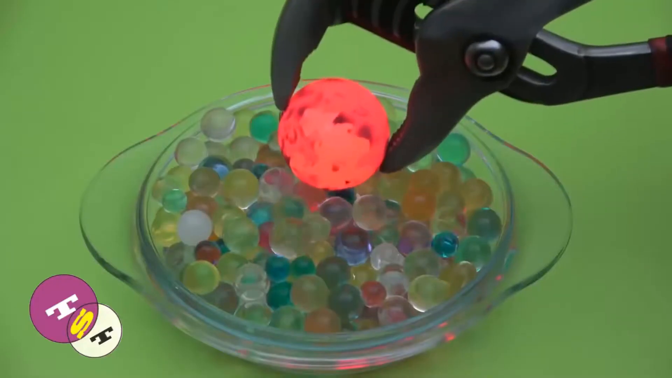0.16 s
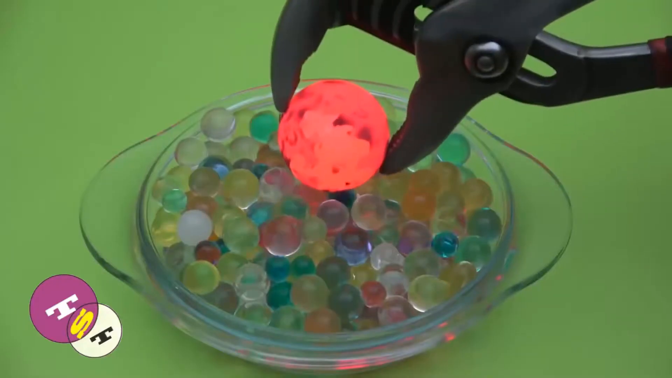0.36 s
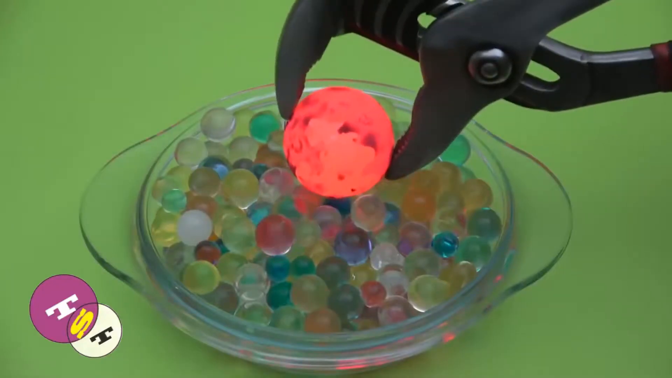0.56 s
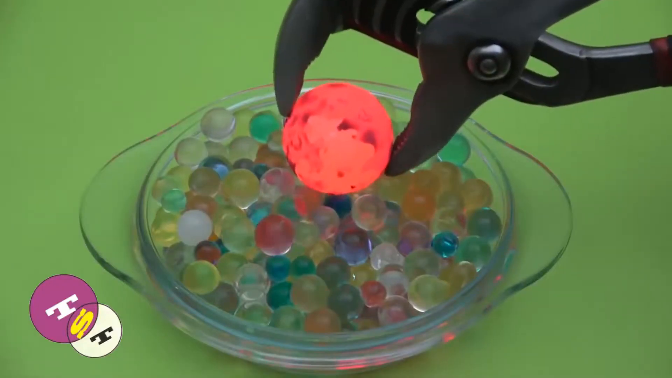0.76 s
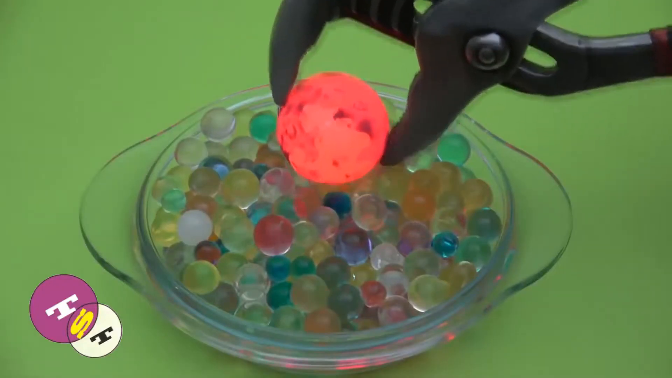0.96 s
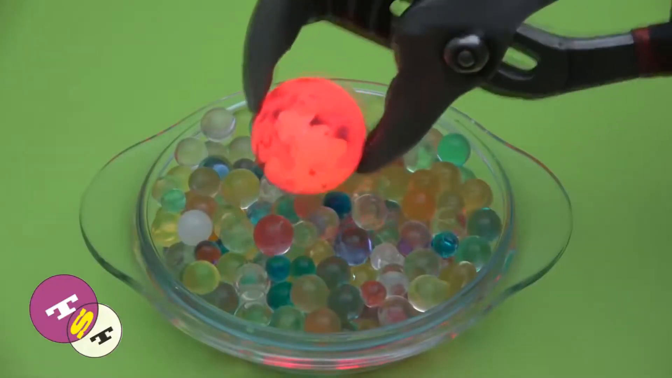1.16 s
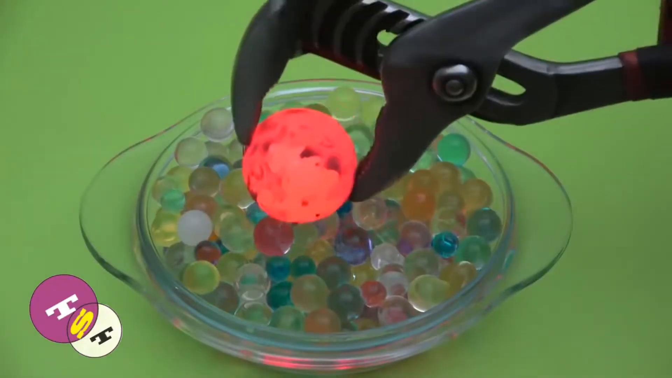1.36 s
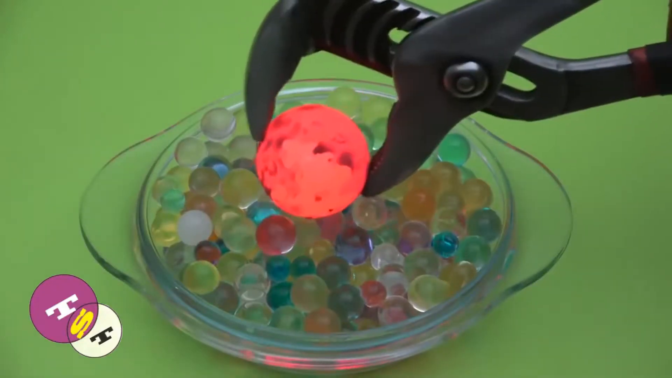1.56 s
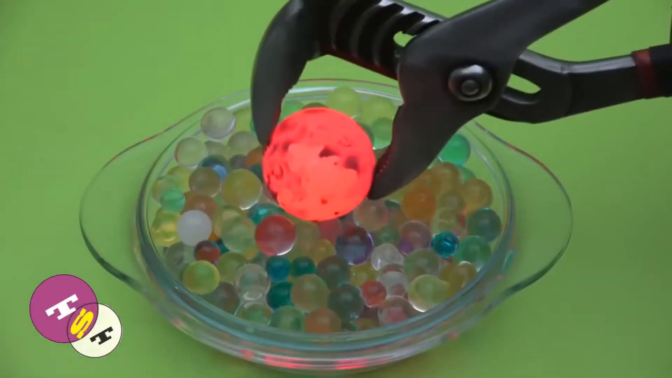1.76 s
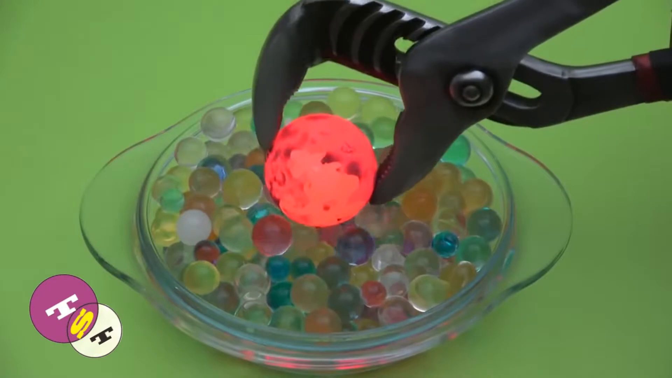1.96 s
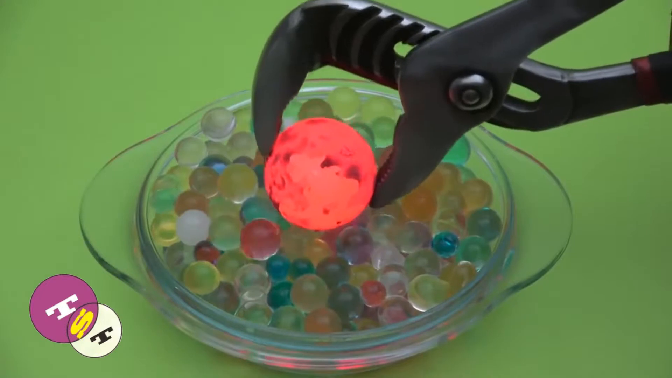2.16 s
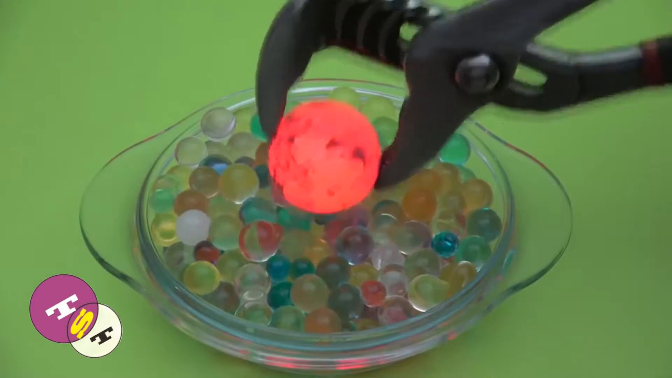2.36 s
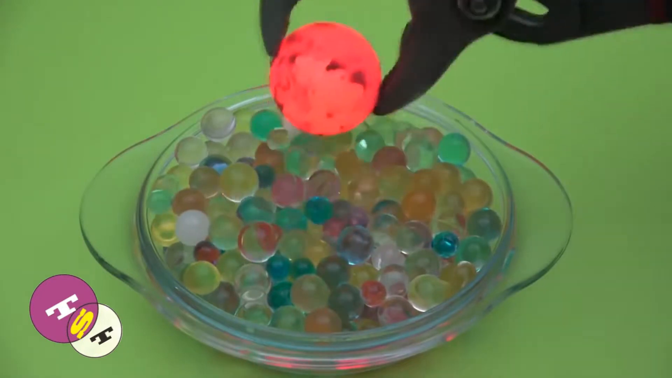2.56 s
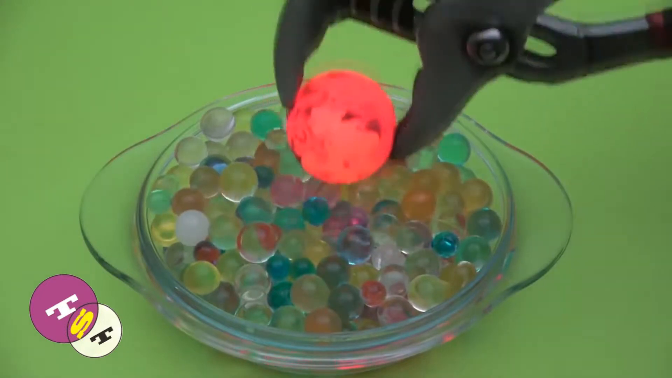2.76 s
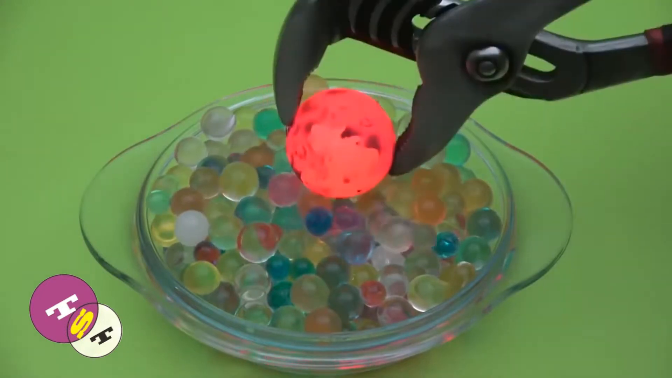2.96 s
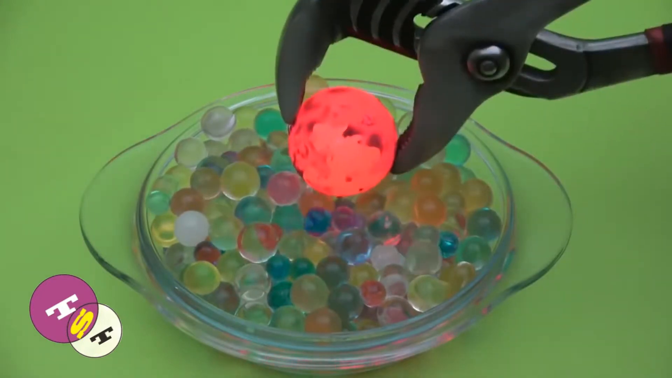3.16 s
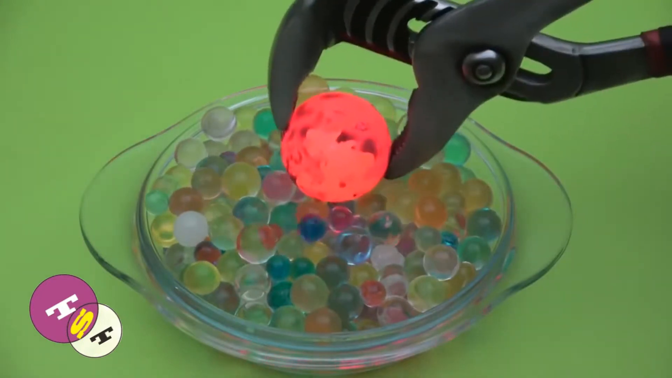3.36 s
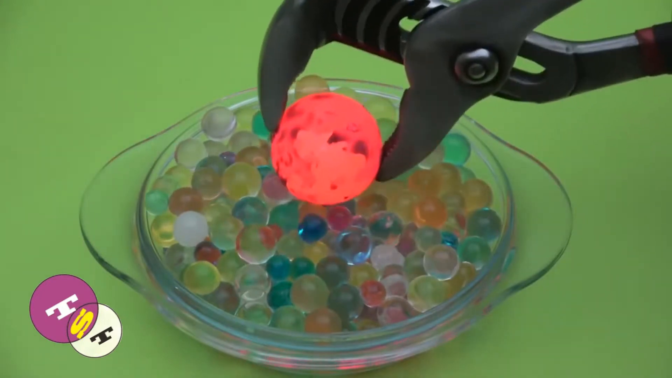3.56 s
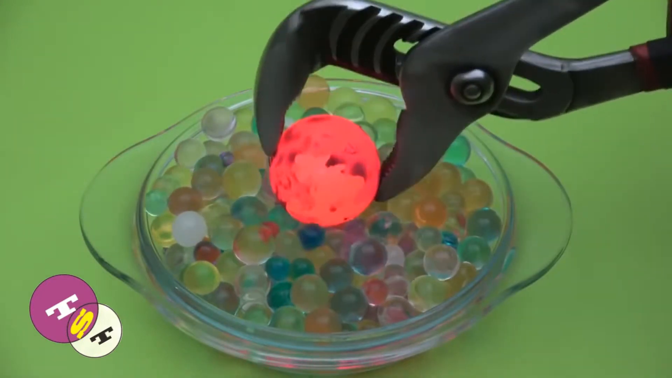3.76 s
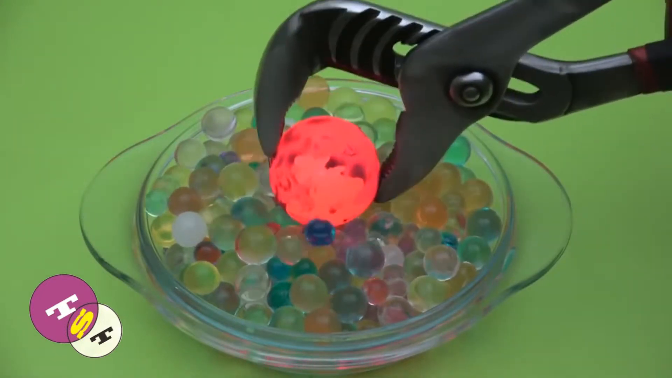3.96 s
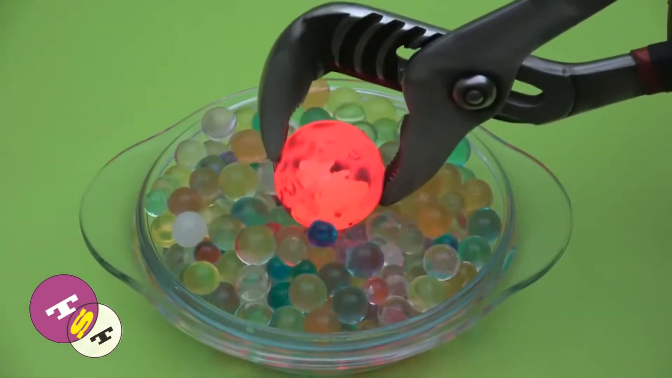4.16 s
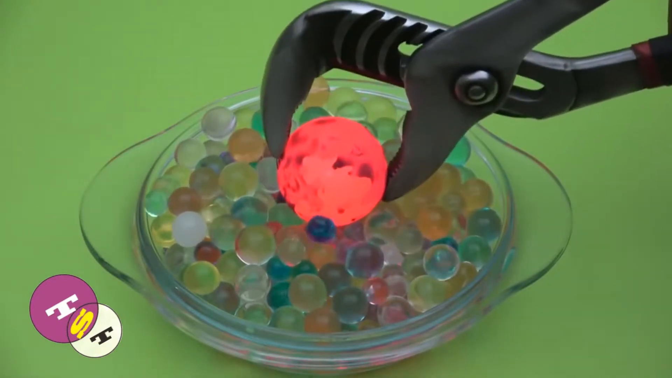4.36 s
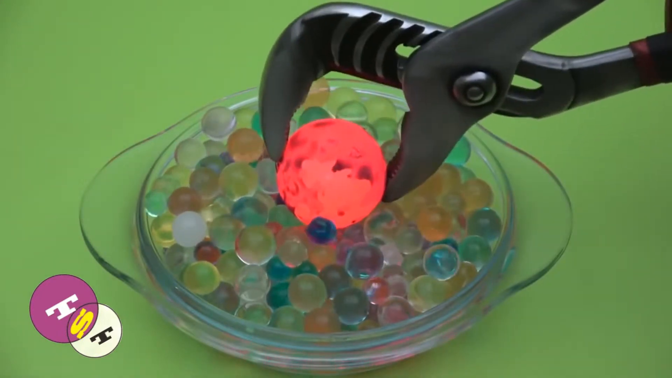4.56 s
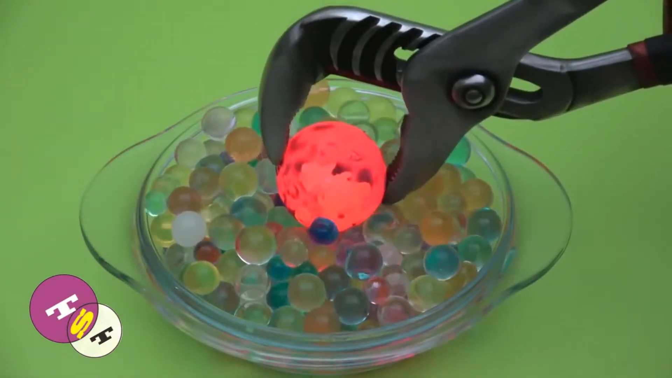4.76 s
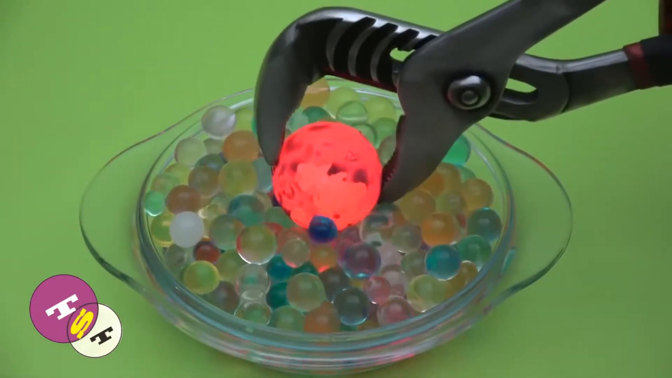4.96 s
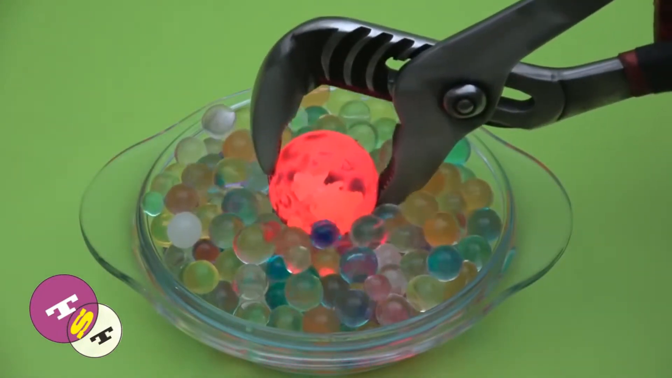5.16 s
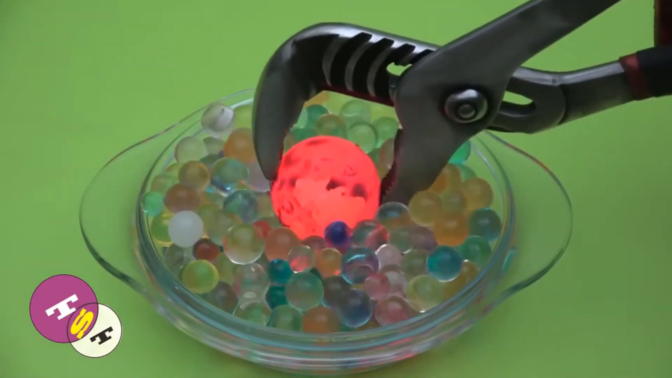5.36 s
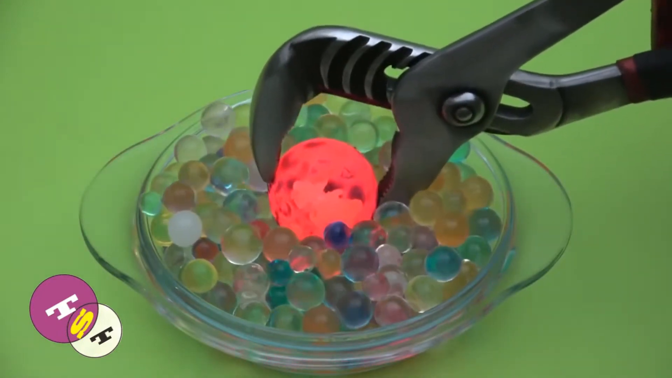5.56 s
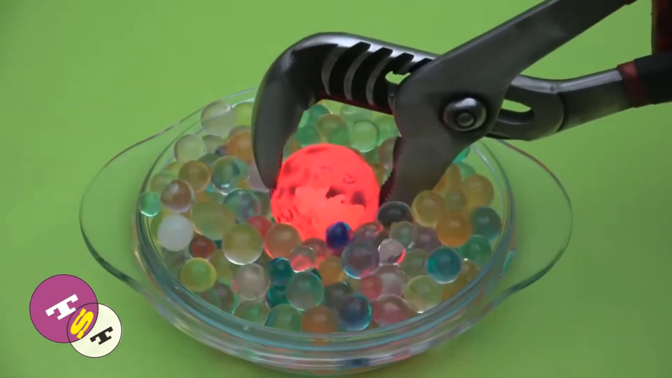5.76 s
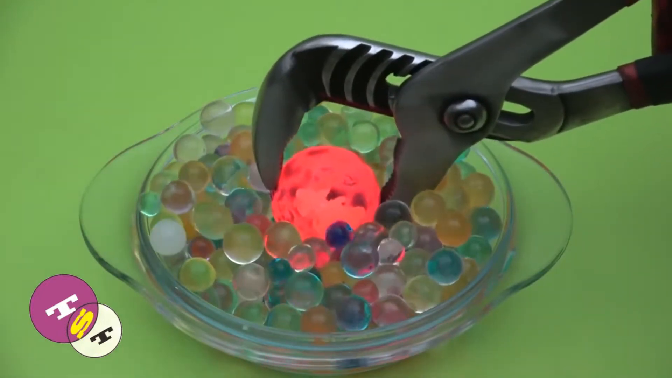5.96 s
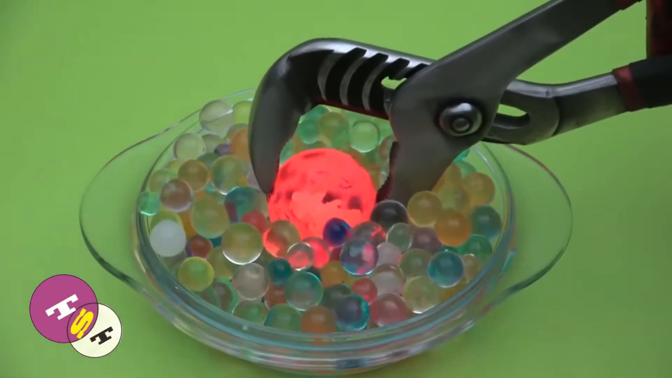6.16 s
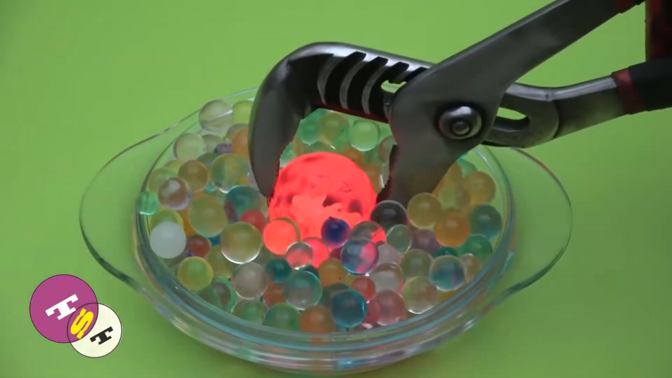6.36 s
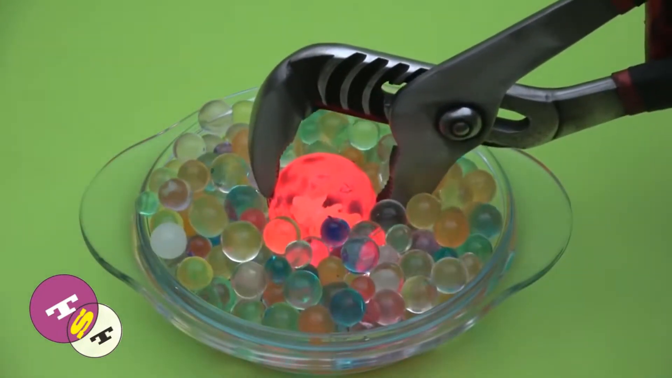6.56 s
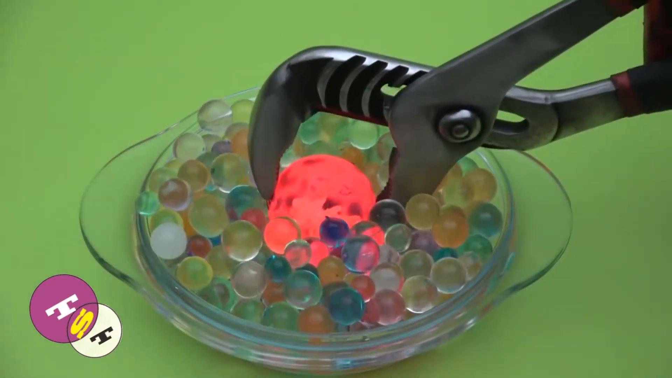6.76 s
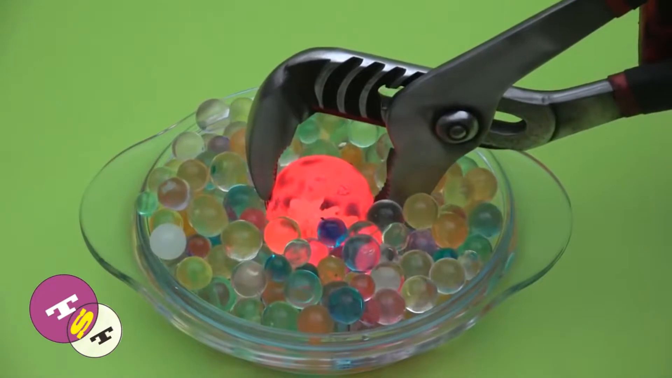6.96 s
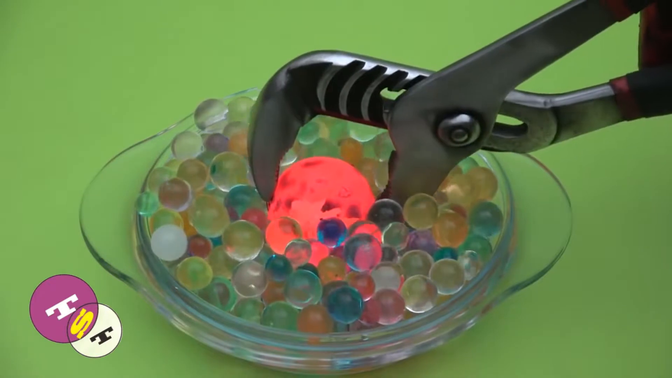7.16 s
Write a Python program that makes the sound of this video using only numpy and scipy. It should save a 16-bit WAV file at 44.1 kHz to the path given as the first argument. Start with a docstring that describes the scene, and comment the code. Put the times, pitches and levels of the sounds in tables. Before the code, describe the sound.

A red-hot metal ball is dabbed onto water gel beads in a glass dish. Thin, high squeals and a faint hiss come first, then louder bursts of spitting steam and gliding, warbling squeals, with sharp pops as beads burst. From halfway the ball is pressed in, and the squealing and sizzling run on over a soft, low bubbling. The sound is fairly close, in a small hard room with a faint fan-like drone.

```python
"""Thin, high squeals and a faint hiss come first, then louder spitting and warbling, over a fan-like drone.
A red-hot metal ball, held in pliers, is dabbed and then pressed into a glass dish of water-gel beads.
Where a bead meets the metal, the vapour gap between them opens and shuts thousands of times a second
and squeals on a gliding pitch. Steam spits out, some beads burst, and a low bubbling joins halfway.
A small hard room rings on after each sound."""
import sys
import numpy as np
from scipy import signal
from scipy.fft import rfft, irfft, next_fast_len
from scipy.io import wavfile
from scipy.ndimage import uniform_filter1d, minimum_filter1d

SR = 44100
rng = np.random.default_rng(int(sys.argv[2]) if len(sys.argv) > 2 else 0)


def dump(signal):
    """Clip the signal to [-1, 1] and save it as 16-bit WAV at the path in sys.argv[1]."""
    limited = np.clip(np.atleast_2d(signal).T, -1, 1)
    pcm = np.round(limited * 32767).astype(np.int16)
    wavfile.write(sys.argv[1], SR, pcm)


N = 318481
T = np.arange(N) / SR
TOP_HZ = 15600  # the treble is cut above this


def undb(db):
    """Turn decibels into a number to multiply by."""
    return 10 ** (np.asarray(db) / 20)


def set_level(x, db):
    """Scale a sound to an average (RMS) level."""
    return x * undb(db) / np.sqrt(np.mean(x ** 2))


def colour(x, points, closed=False):
    """Filter by (f/Hz, gain/dB) points; closed=True silences everything beyond their ends."""
    size = next_fast_len(x.shape[-1])
    hz, db = np.transpose(points)
    edge_db = -120 if closed else None
    bin_hz = np.arange(size // 2 + 1) * SR / size
    gain = undb(np.interp(np.log(bin_hz + 1), np.log(hz), db, edge_db, edge_db))
    return irfft(rfft(x, size) * gain, size)[..., :x.shape[-1]]


def wander(rate_hz, size=N):
    """A smooth random curve, straying about 1 from zero, with rate_hz new values a second."""
    hold = max(int(SR / rate_hz), 1)
    held = np.repeat(rng.standard_normal(size // hold + 1), hold)
    return 1.324 * uniform_filter1d(uniform_filter1d(held, hold), hold)[:size]


# The drone's mix of low and high sound: f/Hz, gain/dB
DRONE_COLOUR = [(12, -32.5), (20, -7), (53, -1), (216, -14), (270, -7.5), (319, -17), (367, -6.5),
                (434, -12), (642, -6), (738, -7.5), (802, -7.5), (1290, -6.5), (1480, -26.5), (13900, -28),
                (16000, -35)]
# How much the drone differs between left and right: f/Hz, level/dB against what both share
DRONE_WIDTH = [(30, -24), (125, -9), (300, -7), (700, -11), (1500, -6.5), (5000, -8)]
def drone():
    """Steady, fan-like room noise that swells a little."""
    mid, side = colour(rng.standard_normal((2, N)), DRONE_COLOUR, closed=True)
    side = colour(side, DRONE_WIDTH)
    return set_level(np.array([mid + side, mid - side]), db=-48) * undb(0.63 * wander(0.78))


# The echo's spread between left and right, growing with pitch: f/Hz, side minus mid level/dB
STEREO_WIDTH = [(1000, -66.5), (2500, -51.5), (5000, -16.5), (9000, -1), (14000, -0.5)]
def room(x, ring_s=0.35):
    """Hard walls blur the sound into a short echo that dies by 60 dB in ring_s."""
    t = T[:SR // 2]
    decay = np.exp(-np.log(1000) * t / ring_s)
    onset = np.clip((t - .002) / 0.0009, 0, 1)
    mid, side = rng.standard_normal((2, len(t))) * decay * onset
    side = colour(side, STEREO_WIDTH)
    tail = np.array([mid + side, mid - side]) * undb(-7.5) / np.sqrt(np.sum(mid ** 2))
    reflected = colour(x, [(1000, 0), (2100, -2), (3000, 2.5), (14000, -5.5)])
    return signal.fftconvolve(reflected[None], tail, axes=1)[:, :N]


# The bubbling grows once the ball sits among the beads: t/s, level/dB
BUBBLING_LEVELS = [(3.7, -82), (3.73, -58), (7.2, -48.5)]
def bubbling():
    """A dull, uneven gurgle from under the ball."""
    times, db = np.transpose(BUBBLING_LEVELS)
    lumpy_noise = undb(3.9 * wander(30)) * rng.standard_normal(N)
    gurgle = colour(lumpy_noise, [(100, -15.5), (200, 4), (400, 2.5), (600, -8.5)], closed=True)
    return set_level(gurgle, 0) * undb(np.interp(T, times, db, left=-120))


# Steam strength, one curve for each touch of the ball: t/s, level/dB
TOUCHES = [
    [(.004, -47), (.028, -56), (.124, -38.5), (.18, -55), (.227, -62)],
    [(.233, -50), (.281, -36), (.473, -64)],
    [(.515, -72), (.535, -16), (.559, -26), (.623, -24), (.718, -39), (.742, -39), (.766, -44), (.798, -47),
     (.894, -60)],
    [(.914, -21), (.95, -23), (.99, -30), (1.01, -55), (1.04, -62), (1.191, -57)],
    [(1.435, -30.5), (1.467, -13.5), (1.562, -12.5), (1.642, -27), (1.69, -14), (1.722, -27), (1.786, -17),
     (1.834, -28), (1.866, -22.5), (1.91, -27.5), (2.025, -45.5), (2.049, -29.5), (2.113, -24),
     (2.161, -28), (2.297, -58), (2.401, -46), (2.44, -74)],
    [(2.792, -20.5), (2.82, -10.5), (2.865, -12.5), (2.9, -16), (2.916, -22), (3.103, -38.5), (3.151, -46),
     (3.191, -42)],
    [(3.204, -19), (3.233, -11.5), (3.273, -14), (3.297, -41), (3.308, -37), (3.312, -13), (3.335, -20.5),
     (3.37, -34), (3.448, -61), (3.544, -46)],
    [(3.698, -36.5), (3.73, -31.5), (3.745, -21.5), (3.817, -13), (3.905, -13), (3.96, -34), (4.137, -30),
     (4.192, -35), (4.368, -26.5), (4.504, -32), (4.6, -38.5), (4.687, -32), (4.775, -40.5), (4.839, -30.5),
     (4.983, -23.5), (5.03, -30.5), (5.11, -29), (5.214, -22.5), (5.39, -30), (5.454, -24.5),
     (5.653, -33.5), (5.845, -18.5), (5.856, -27), (6.068, -26.5), (6.228, -20), (6.356, -17.5),
     (6.427, -22), (6.539, -23), (6.603, -19), (6.93, -14), (7.03, -22.5), (7.218, -27.5)],
]
# Low boiling and high sizzle against the hiss of strong steam: t/s, boiling level/dB, sizzle level/dB
STEAM_BALANCE = [(.1, -12, 7), (.22, -15, 4), (.25, -17, 3), (.55, -33, -2), (.62, -19, 5.5),
                 (.72, -22, 5.5), (.8, -26, -23), (.92, -57, -4), (1.0, -30, -3), (1.46, -17, -1.5),
                 (1.78, -16.5, -9), (1.84, -12, 4), (2.05, -22, 3.5), (2.16, -15.5, 8), (2.3, -13, -19),
                 (2.399, -21, 7.5), (2.8, -10.5, -6), (3.15, -11, 6.5), (3.21, -14, -9), (3.31, -3.5, -4.5),
                 (3.4, 0, -16), (3.699, -30, -8), (3.76, -16, -4), (3.9, -17, -6.5), (4.37, -19, 0),
                 (4.77, -19, -15), (4.85, -25, 5.5), (5.1, -12, -3), (5.25, -22, 4), (5.5, -16.5, -0.5),
                 (5.85, -16.5, -8.5), (6.07, -17, -4), (6.6, -19.5, -10), (6.93, -14.5, -30),
                 (7.2, -12.5, -7)]
def steam_levels(strong_db=-14):
    """Hiss, boiling and sizzle levels in dB; between touches nothing boils."""
    db = np.full((3, N), -120.)
    balance_times, boil_db, sizzle_db = np.transpose(STEAM_BALANCE)
    for touch in TOUCHES:
        times, touch_db = np.transpose(touch)
        on = (T > times[0] - .003) & (T < times[-1])
        hiss_db = np.interp(T[on], times, touch_db)
        drop_db = strong_db - hiss_db  # boiling and sizzle win back a little of this drop
        db[:, on] = [hiss_db,
                     hiss_db + np.interp(T[on], balance_times, boil_db) + .12 * drop_db,
                     hiss_db + np.interp(T[on], balance_times, sizzle_db) + .034 * drop_db]
    return db


def film_settled(settle_s=.25):
    """0 at each fresh touch, rising to 1 as the film of vapour settles."""
    starts = np.array([touch[0][0] for touch in TOUCHES])
    since_s = T - starts[np.maximum(np.searchsorted(starts, T) - 1, 0)]
    return 1 - np.exp(-np.abs(since_s) / settle_s)


# The steam's main hiss: f/Hz, gain/dB
HISS_BAND = [(1300, -16.5), (1900, 3.5), (2600, -6.5), (3600, 3), (5000, 2), (7000, 5.5), (8800, -2)]
# Its low boiling: f/Hz, gain/dB
BOIL_BAND = [(250, -23.5), (450, -7.5), (800, -0.5), (1300, 5), (1900, 8)]
# Its high sizzle: f/Hz, gain/dB
SIZZLE_BAND = [(7500, 4.5), (8800, -1), (11000, -1.5), (13500, -3.5), (15500, -41)]
# Beads bursting: t/s, peak level/dB before filtering
BURSTS = [(0.4825, -22), (0.53, -13), (0.914, -24), (1.4601, -6.5), (1.854, -3), (2.393, -29.5),
          (3.2675, 17), (3.3106, 17), (3.3322, 11), (5.0623, -1), (5.45, -24)]
def steam(levels_db):
    """Vapour leaves in uneven spits that all three bands share; a bursting bead adds a sharp puff."""
    spits = undb(1.63 * wander(900) + 2.3 * wander(120) + 2.0 * wander(25))
    out = np.zeros(N)
    for band, db in zip((HISS_BAND, BOIL_BAND, SIZZLE_BAND), levels_db):
        noise = colour(spits * rng.standard_normal(N), band, closed=True)
        out += set_level(noise, 0) * undb(db + 0.31 * wander(12))
    puff_shape = sum(undb(db) * (T >= at) * np.exp(-np.abs(T - at) / 0.0023) for at, db in BURSTS)
    puffs = puff_shape * rng.standard_normal(N)
    return out + colour(puffs, [(400, -28.0), (1500, -6), (8000, -14.5), (14000, -24.5)])


def vapour_gap(hz, second_db, third_db, flutter_db, octave_db, bright_hz=3100):
    """The beating gap sounds its pitch and multiples of it (harmonics); it radiates best at bright_hz."""
    phase = 2 * np.pi * (np.cumsum(hz) / SR + rng.random())
    harmonics_db = [0 * hz, second_db, third_db]
    for k in range(3, int(TOP_HZ / hz.min())):
        # follow the harmonic two below: louder if that lies under bright_hz, softer if over
        harmonics_db.append(harmonics_db[k - 2] + octave_db * np.log2((k - 1) * hz / bright_hz))
    tone = np.zeros(len(hz))
    for n, db in enumerate(harmonics_db, start=1):
        in_range = hz < .45 * SR / n
        tone += undb(db + flutter_db * wander(150, len(hz))) * np.sin(n * phase) * in_range
    return tone


def add_squeal(out, curve, wobble, flutter_db, octave_db, rise_s=0.0017, fall_s=.008):
    """Add one unsteady squeal from rows of t/s, f/Hz, level/dB, 2nd harmonic/dB, 3rd harmonic/dB."""
    times, *columns = np.transpose(curve)
    start, end = max(int(times[0] * SR), 0), min(int((times[-1] + fall_s / 2) * SR), N)
    t, size = T[start:end], end - start
    hz, db, second_db, third_db = (np.interp(t, times, column) for column in columns)
    shake = wander(60, size) + .8 * wander(300, size) + 1.8 * wander(1500, size)
    shaky_hz = hz * (1 + wobble[start:end] * shake)
    tone = vapour_gap(shaky_hz, second_db, third_db, 0.28 * flutter_db, octave_db)
    fade = np.clip(np.minimum((t - t[0]) / rise_s, (t[-1] - t) / fall_s), 0, 1)
    out[start:end] += np.sqrt(2) * tone * fade * undb(db + flutter_db * wander(110, size))


def faint_squeals(base_db, count=800):
    """Beads that barely touch the ball make a crowd of short glides, up to 9 dB above base_db."""
    out, wobble = np.zeros(N), np.full(N, .007)
    for when, pitch, bend, length, strength in rng.random((count, 5)):
        times = when * N / SR + np.array([0, .5, 1]) * (.015 + .09 * length ** 2)
        hz = 2500 * 3.0 ** pitch * (1 + .22 * (bend - .55) * np.array([0, .3, 1]))
        db = np.interp(times, T[::64], base_db[::64]) + 9 * strength
        curve = [(*row, -6, -16) for row in zip(times, hz, db)]
        add_squeal(out, curve, wobble, flutter_db=2.0, octave_db=-10)
    return out


def arc(start_s, length_s, first_hz, middle_hz, last_hz, peak_db, peak_at, second_db):
    """The curve of a brief squeal: the pitch bends smoothly, the level swells to one peak and fades."""
    swell_db, fade_db = 7.5, 10.5
    peak_at = np.clip(peak_at, .01, .99)
    progress = np.sort(np.append(np.linspace(0, 1, num=9), peak_at))
    parabola = np.polyfit([0, .5, 1], [first_hz, middle_hz, last_hz], deg=2)
    hz = np.polyval(parabola, progress)
    db = peak_db - np.interp(progress, [0, peak_at, 1], [swell_db, 0, fade_db])
    return list(zip(start_s + length_s * progress, hz, db, np.full_like(hz, second_db)))


# Brief squeals: start t/s, length/s, first f/Hz, middle f/Hz, last f/Hz, peak level/dB,
# place of the peak (0 to 1), 2nd harmonic level/dB against the 1st
BRIEF_SQUEALS = [ (.003, .062, 6630, 7640, 9150, -30, 0, -15), (0.041, 0.081, 5990, 6340, 6000, -24, 1, -5),
                 (.125, 0.062, 6100, 7200, 8800, -22.5, 0.4, -18),
                 (.129, 0.09, 3117, 3350, 3260, -35, 0.63, -11),
                 (0.171, 0.052, 4760, 4660, 4650, -35.5, .05, -20),
                 (0.479, .053, 2930, 3120, 3200, -23, 0.96, -4),
                 (0.528, 0.023, 2090, 2250, 2277, -15, 0.56, -13),
                 (.532, 0.1, 4497, 3990, 4010, -12, 0.58, 0),
                 (0.582, 0.02, 3630, 3450, 3600, -14.5, .05, 4), (.6, .1, 4150, 4600, 4800, -17, .45, 0),
                 (0.642, 0.044, 4090, 4080, 4090, -16, 0.87, -3),
                 (0.651, 0.064, 3190, 2736, 2780, -27, 0.5, -9),
                 (0.751, .012, 5300, 6100, 7300, -21, .05, -35),
                 (0.942, .025, 4600, 4476, 4570, -27, .3, -18),
                 (0.953, 0.044, 3240, 2920, 3150, -26, 0.55, -8),
                 (1.434, 0.11, 3450, 2686, 2795, -17, 0.07, -1.5),
                 (1.545, 0.045, 1492, 1510, 1530, -25.5, .05, -6),
                 (1.655, .11, 1620, 1414, 1377, -25, 0.2, -10),
                 (1.916, 0.15, 4600, 4660, 4580, -24.5, 0.01, -7),
                 (2.087, 0.067, 7050, 6990, 7170, -20, .55, -37),
                 (2.091, 0.028, 3120, 2520, 2450, -34, 0.84, 8),
                 (2.359, 0.023, 4190, 4210, 4240, -36.5, .05, -3),
                 (2.388, 0.022, 9300, 9660, 10500, -29, 0.31, -40),
                 (2.797, 0.066, 2245, 1903, 2103, -12, 0.36, -6),
                 (2.881, 0.036, 1936, 1812, 1950, -19, 0.28, 4),
                 (2.966, 0.065, 3730, 3680, 3670, -39, 0.43, -15),
                 (2.999, 0.049, 1242, 1202, 1220, -35, 0.14, -15),
                 (3.199, 0.065, 1982, 1683, 1650, -15, 0.18, -6),
                 (3.703, 0.11, 3945, 3615, 3000, -16.5, 0.68, -0.5),
                 (3.717, 0.069, 6770, 4430, 4600, -18, .9, -11),
                 (3.854, 0.021, 4220, 3750, 3300, -32, .9, 0),
                 (3.921, 0.024, 3230, 3160, 2950, -25, .05, -14),
                 (3.97, .054, 4606, 4800, 4920, -23, 0.94, -16),
                 (3.976, 0.094, 1916, 2015, 2124, -31.5, 0.76, -2),
                 (4.033, 0.1, 3630, 3310, 3350, -28, 0.1, -1),
                 (4.057, 0.12, 6570, 6750, 6650, -26.5, 0.95, -30),
                 (4.079, 0.035, 4450, 4430, 4420, -27, .8, -11),
                 (4.204, 0.15, 4700, 3316, 4740, -24.5, 0.61, 5.5),
                 (4.242, 0.069, 4350, 4660, 4870, -27, 0.97, 2),
                 (4.293, 0.22, 6320, 5560, 5950, -23.5, 0.08, -25),
                 (4.512, 0.14, 6620, 6770, 6260, -28, .55, -25),
                 (4.61, .056, 2410, 2384, 2260, -32, .9, -2),
                 (4.635, 0.092, 3044, 2863, 3030, -24, 0.59, -1),
                 (4.647, 0.03, 6230, 6300, 6200, -21, .9, -30),
                 (4.698, 0.034, 7270, 7000, 6800, -25, .05, -35),
                 (4.79, 0.038, 2440, 2395, 2360, -24.5, .65, -7),
                 (4.829, 0.031, 2910, 2960, 2925, -23, .25, -2),
                 (4.862, .015, 3510, 3470, 3310, -18.5, .9, 5),
                 (4.878, 0.04, 3050, 3150, 3080, -26.5, 0, 11),
                 (4.898, 0.057, 8430, 8370, 9260, -16.5, 0.2, -40),
                 (4.939, .048, 3510, 3620, 3650, -25, .3, 0.5),
                 (5.063, 0.059, 1968, 1892, 2180, -14.5, 0, -8),
                 (5.17, 0.02, 7270, 7120, 7100, -13.5, 0.7, -11),
                 (5.193, .051, 4290, 4320, 3900, -21, .05, -5),
                 (5.259, 0.095, 4630, 4490, 4180, -19.5, 0.3, -4),
                 (5.36, 0.017, 4500, 4650, 4930, -15.5, 1, -6),
                 (5.385, 0.042, 4740, 4560, 4240, -20.5, 0.26, -14),
                 (5.419, 0.0076, 7190, 7130, 7150, -9, 0.3, -23),
                 (5.524, 0.065, 4750, 4600, 4720, -25, 0.4, -5),
                 (5.556, 0.13, 6800, 6620, 6570, -27, 0.2, -33),
                 (5.604, 0.13, 4920, 4790, 4785, -22, 0.5, -4),
                 (5.678, 0.052, 3080, 3040, 2910, -18, 0.3, -15),
                 (5.685, 0.078, 5560, 5250, 4830, -23, 0, -1),
                 (5.748, 0.058, 3570, 3597, 3620, -18.5, 0.3, 8),
                 (5.866, 0.21, 5470, 5630, 5580, -24.5, 0.02, -26),
                 (5.987, .138, 6800, 6800, 6510, -28, 0.8, -23),
                 (6.25, 0.112, 3410, 3440, 3360, -22, 0.75, 8),
                 (6.301, 0.045, 1870, 1906, 1970, -13.5, 0.45, -21),
                 (6.374, 0.19, 3360, 3605, 3490, -16, 0.33, -9),
                 (6.374, 0.18, 1356, 1370, 1287, -28.5, 0.02, -21),
                 (6.528, 0.022, 3166, 3234, 3244, -13.5, 1, -12),
                 (6.609, 0.028, 2840, 3010, 3020, -5, 0.53, -13),
                 (6.62, .06, 1525, 1514, 1500, -33, .05, -15),
                 (6.65, 0.054, 3060, 3040, 2630, -9, 0.05, -17),
                 (6.736, 0.034, 3286, 3120, 3000, -11, 0.95, -16),
                 (6.97, 0.03, 2697, 2766, 2840, -11.5, 0, -17),
                 (7.01, 0.12, 2827, 3170, 3210, -14, 0.2, -27),
                 (7.087, 0.045, 2370, 2498, 2710, -22, .05, -12),
                 (7.135, 0.099, 2690, 2570, 2540, -22, .9, -1), ]
# Longer warbling squeals; near the end one adds undertones at half and a quarter of its pitch.
# Each curve: t/s, f/Hz, level/dB, 2nd harmonic level/dB against the 1st
LONG_WARBLES = [
    [(.232, 3000, -24, -6), (.248, 2930, -24, -5), (.281, 2550, -23.5, -6), (.329, 2570, -27, 0),
     (.352, 2793, -24, 3.5), (.362, 3270, -35, 3)],
    [(1.571, 3057, -28, -12), (1.589, 3445, -13.5, 4), (1.613, 3436, -24.5, 1.5), (1.694, 3040, -24, 8)],
    [(1.703, 2750, -27, 5), (1.76, 2610, -31, -3), (1.823, 2190, -26.5, 9), (1.865, 2310, -23, 5.5),
     (1.886, 2600, -29, 6)],
    [(1.907, 3400, -26, 9), (1.916, 3514, -10, 6), (1.943, 3490, -45, -13), (1.961, 3890, -37, -11),
     (2.002, 4010, -24.5, -8), (2.041, 3740, -33, 7), (2.056, 3360, -18.5, 4), (2.068, 3450, -47, -6)],
    [(2.11, 2970, -32, 2), (2.122, 3000, -18, -2), (2.146, 3254, -23, 0), (2.16, 2944, -24, 5.5),
     (2.206, 2995, -28.5, 2), (2.25, 2980, -56, 1.5)],
    [(2.948, 2260, -18, -9), (2.966, 2544, -28, 1), (3.041, 2413, -26.5, 1.5), (3.098, 2580, -33.5, 7.5),
     (3.116, 2810, -29.5, 2.5), (3.167, 2560, -64, -6)],
    [(3.837, 2980, -23, -4), (3.861, 2840, -25, 3), (3.882, 3000, -17, 1.5), (3.93, 3860, -20, 4.5),
     (3.95, 4700, -25, -23)],
    [(4.379, 3950, -26, -21), (4.415, 3510, -30, -9), (4.448, 3520, -21.5, -19), (4.484, 4150, -36, -12),
     (4.568, 4060, -26.5, -6), (4.61, 4040, -57, -21)],
    [(5.211, 2610, -35, 11), (5.232, 2620, -23.5, 9), (5.304, 2900, -20, 0.5), (5.325, 2660, -28, 7),
     (5.382, 3030, -32, -5)],
    [(5.449, 3590, -20, 12), (5.463, 3856, -13, -2), (5.519, 3960, -21.5, 6), (5.573, 3700, -26, 7.5),
     (5.693, 3540, -17.5, 4), (5.712, 3250, -23.5, 12.5), (5.795, 2837, -13, -5.5),
     (5.813, 2883, -15.5, -1), (5.849, 3220, -22, 9.5), (5.867, 2970, -37, -15), (5.924, 3170, -40, -5)],
    [(5.989, 4620, -30, -2), (6.022, 4417, -19, -4), (6.091, 3935, -23.5, -2), (6.133, 3536, -15, 5),
     (6.172, 3050, -16.5, 4.5), (6.247, 3100, -16, 1)],
    [(6.25, 4150, -30, 10), (6.28, 3905, -24.5, 11.5), (6.325, 3764, -17, 4.5), (6.362, 3280, -17, 5)],
    [(6.332, 3435, -12, -10), (6.36, 3080, -11.5, -26), (6.379, 2740, -20.5, 1), (6.414, 2697, -12, 1),
     (6.468, 2850, -18, -12), (6.546, 2500, -11, -9.5), (6.564, 2510, -23.5, -4), (6.597, 2498, -3, -16),
     (6.606, 2686, -34, 0)],
    [(6.72, 1310, -29.5, -25), (6.789, 1167, -24, -25), (6.878, 1069, -28.5, -23), (6.95, 1144, -45, -25)],
    [(6.738, 632, -56, -15), (6.789, 586, -53, -13), (6.878, 531.6, -56, -17), (6.94, 567, -57, -15)],
    [(6.738, 2530, -20.5, -13), (6.789, 2333, -12, -6.5), (6.878, 2132, -6.5, -6), (6.932, 2260, -13, -3),
     (6.98, 2277, -17, -4), (6.998, 2400, -13, -5.5)],
    [(7.028, 4930, -28, -13), (7.052, 4710, -24, -28), (7.091, 5340, -36, -1), (7.139, 4610, -26, -14),
     (7.178, 4370, -16, -23)],
    [(7.091, 3500, -22, 0), (7.127, 3620, -17, -14), (7.145, 3330, -13.5, -27), (7.172, 3800, -21, -25)],
]
# Higher squeals mostly have a weaker 3rd harmonic: pitch f/Hz, level/dB against the 1st
THIRD_HARMONIC = [(600, 17), (1200, 2), (1900, -12), (2400, -8.5), (3300, -15), (4500, -22.5), (6000, -41)]
def bead_squeals(steam_db):
    """The clear squeals: rough in the blast of a fresh touch, steadier once the vapour film settles."""
    out = np.zeros(N)
    blast = np.clip((steam_db + 40) / 25, 0, 1)
    wobble = .0055 + .013 * blast * (1 - film_settled())  # as a share of the pitch
    pitches, third_db = np.transpose(THIRD_HARMONIC)
    for rows in [arc(*row) for row in BRIEF_SQUEALS] + LONG_WARBLES:
        curve = [(t, hz, db, second_db, np.interp(hz, pitches, third_db))
                 for t, hz, db, second_db in rows]
        add_squeal(out, curve, wobble, flutter_db=3.4, octave_db=-16)
    return out


# How the sound of the dish leans to one side: f/Hz, left minus right level/dB
LEFT_RIGHT_LEAN = [(300, -4), (1500, -1.5), (4000, 0.74), (9000, -3)]
def scene():
    """The squealing, steaming dish in stereo, with the room's echo and the drone."""
    hiss_db, boil_db, sizzle_db = steam_levels()
    shift_db = 3.5 * film_settled()  # as the film settles, hiss and boiling give way to faint squeals
    dish = bead_squeals(hiss_db) + faint_squeals(hiss_db + shift_db - 16)
    dish += steam([hiss_db - shift_db, boil_db - shift_db, sizzle_db])
    dish += bubbling()
    left = colour(dish, [(hz, db / 2) for hz, db in LEFT_RIGHT_LEAN])
    right = colour(dish, [(hz, -db / 2) for hz, db in LEFT_RIGHT_LEAN])
    return undb(-1.5) * np.array([left, right]) + room(dish) + drone()


def record(dry):
    """The microphone dulls the treble, a limiter turns down the loudest peaks, and the top is cut."""
    top_cut = signal.ellip(12, .3, 90, TOP_HZ, fs=SR, output="sos")
    dulled = colour(dry, [(9500, -0.5), (13000, -4.5), (16000, -6.0)])
    peaks = np.abs(signal.sosfilt(top_cut, dulled)).max(axis=0)
    safe_gain = np.minimum(1, .97 / (peaks + 1e-9))
    smooth_gain = uniform_filter1d(minimum_filter1d(safe_gain, size=65), size=33)
    return np.clip(signal.sosfilt(top_cut, dulled * smooth_gain), -1, 1)


dry = scene()
out = record(dry)
dump(out)
```